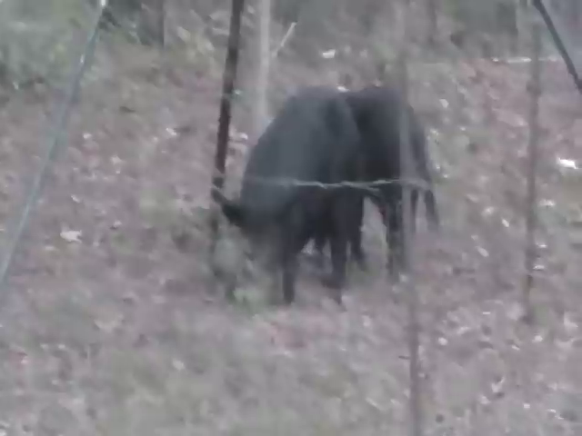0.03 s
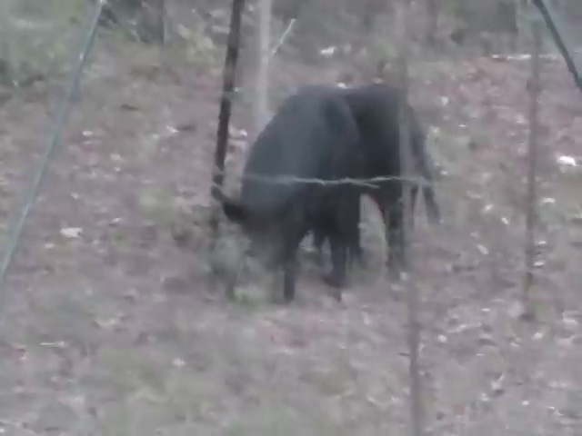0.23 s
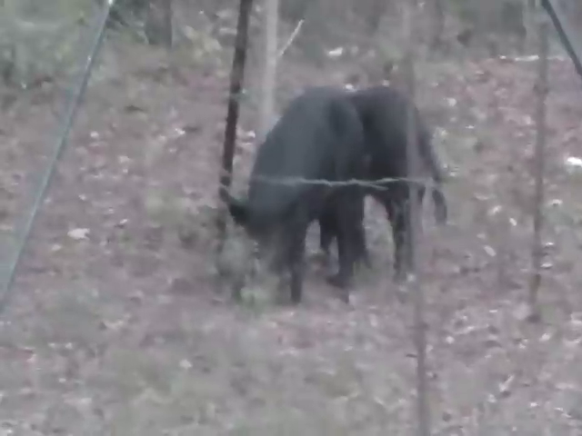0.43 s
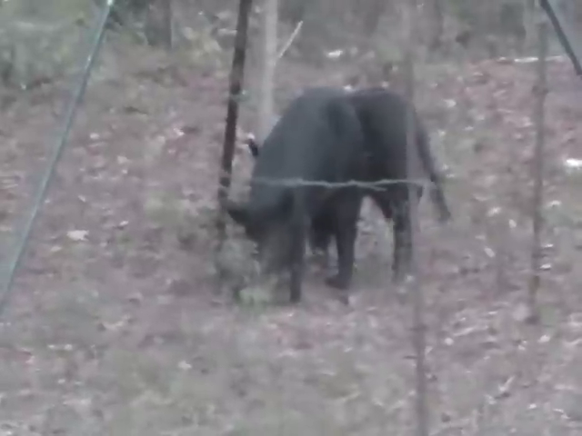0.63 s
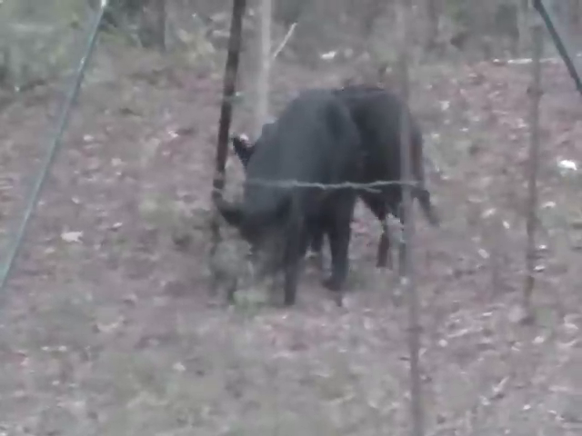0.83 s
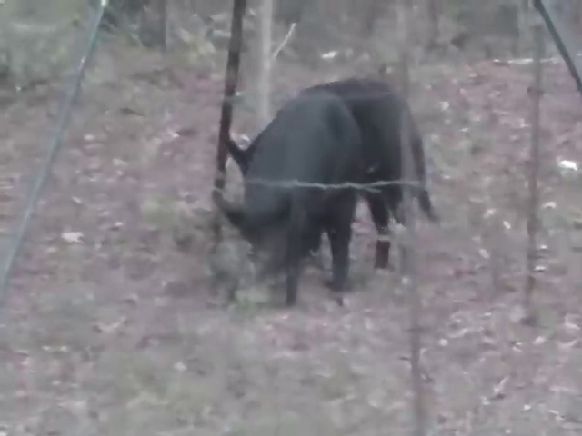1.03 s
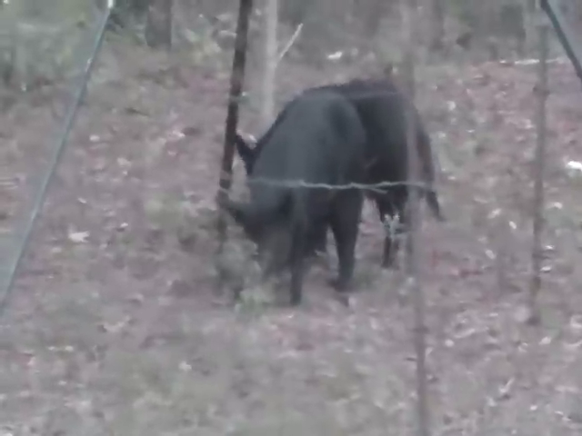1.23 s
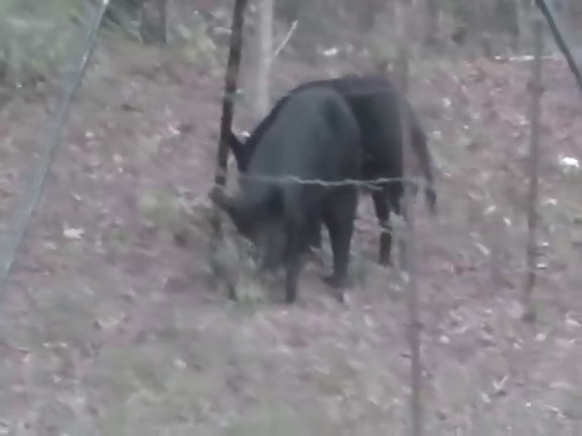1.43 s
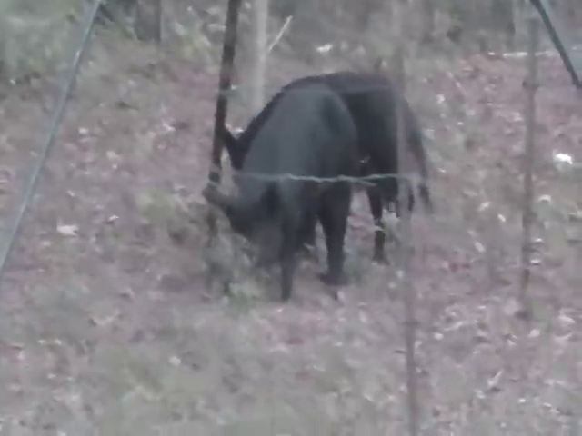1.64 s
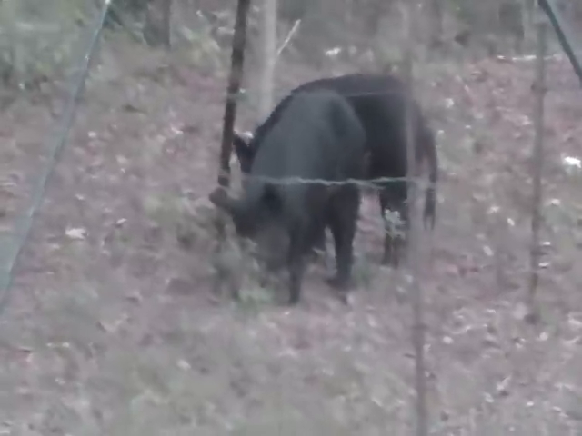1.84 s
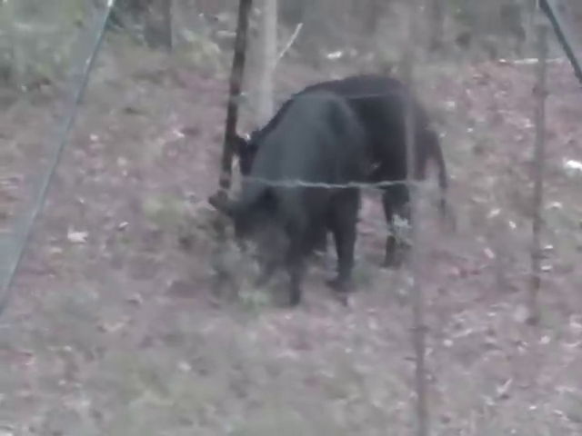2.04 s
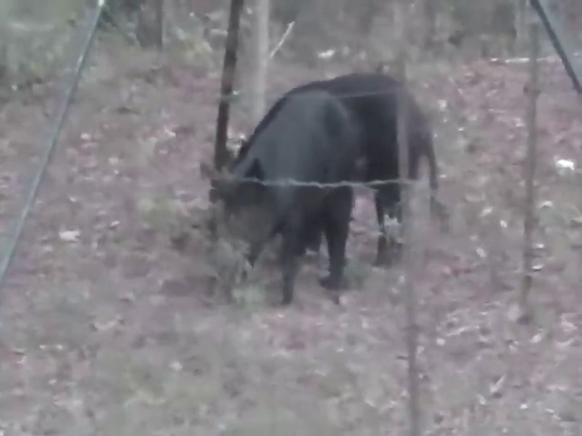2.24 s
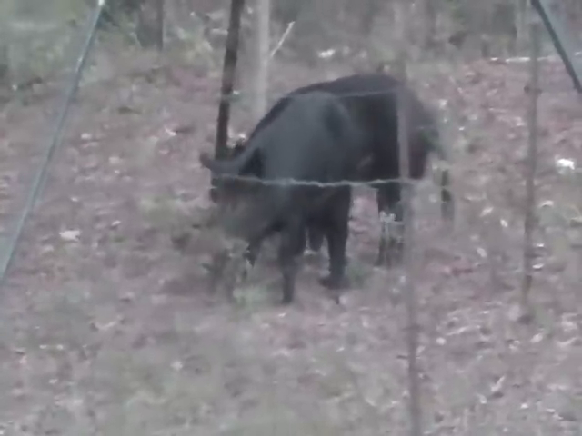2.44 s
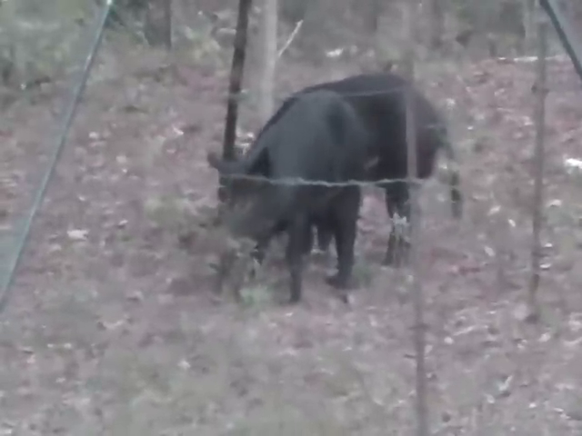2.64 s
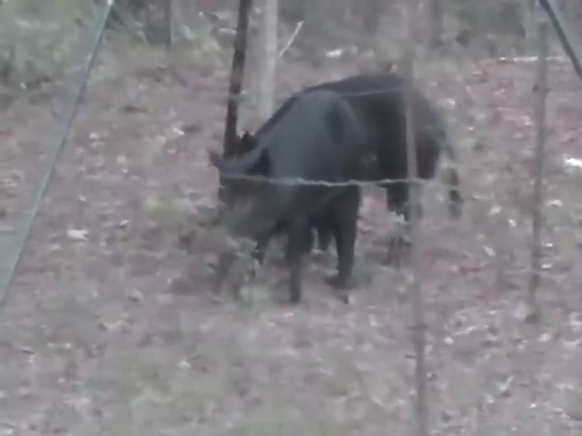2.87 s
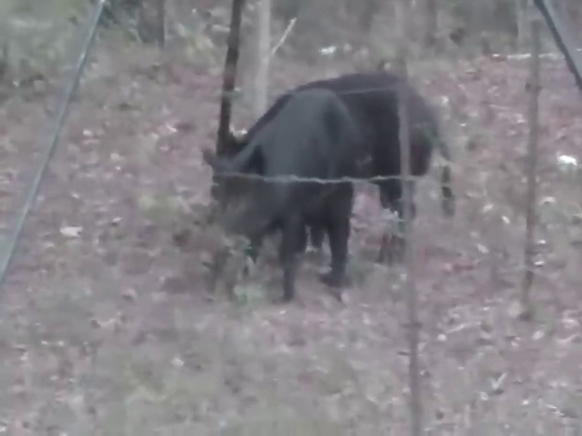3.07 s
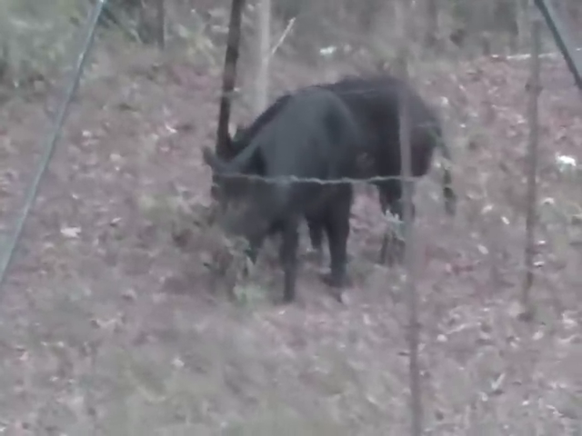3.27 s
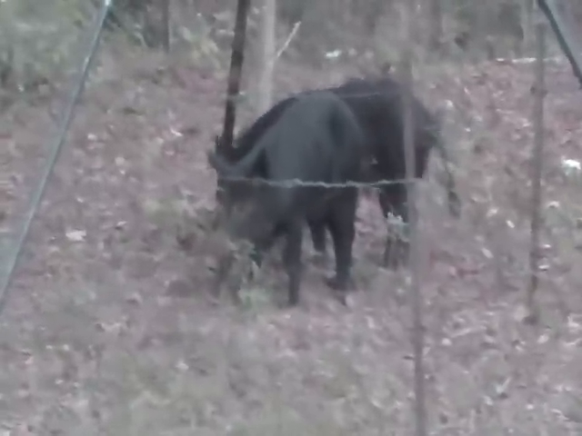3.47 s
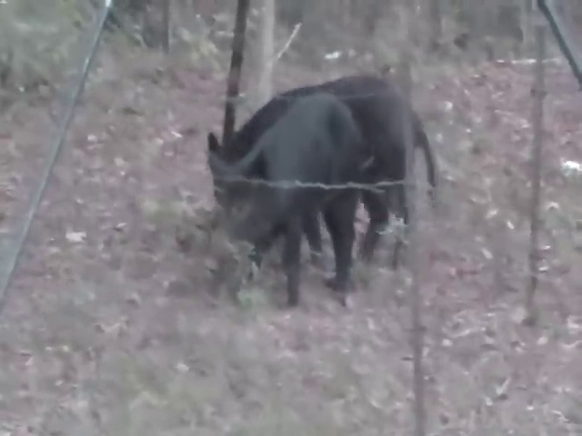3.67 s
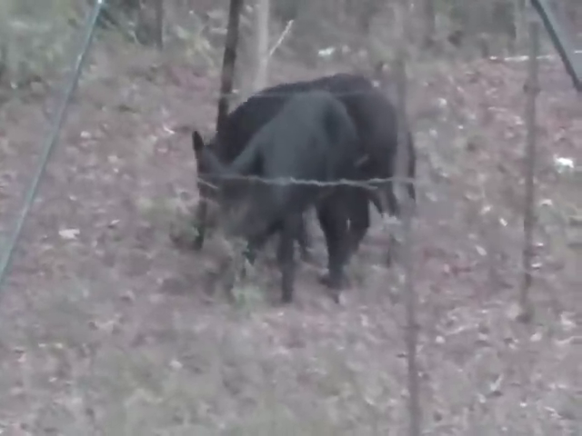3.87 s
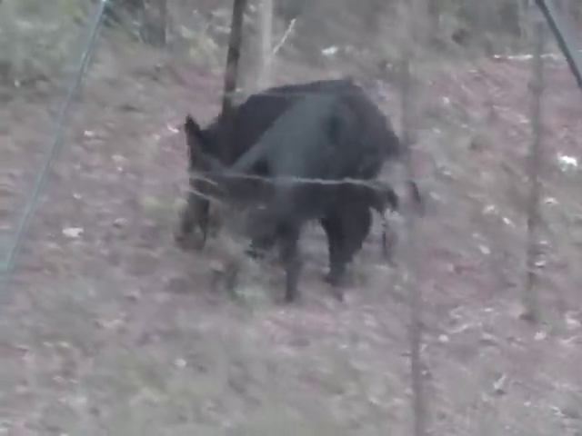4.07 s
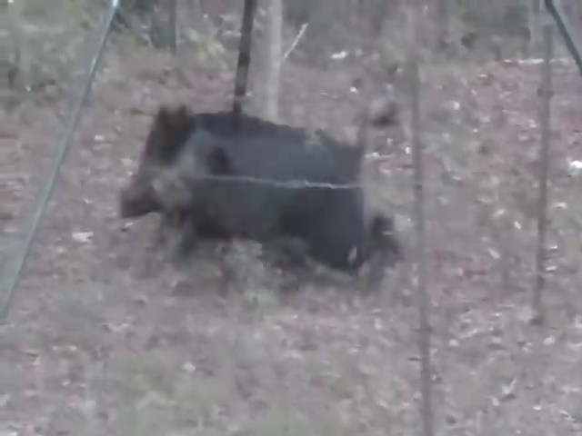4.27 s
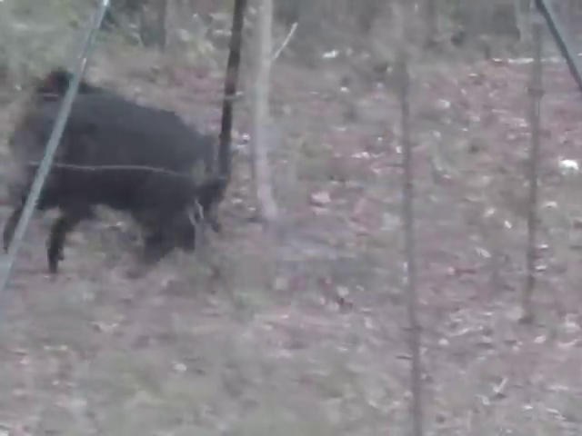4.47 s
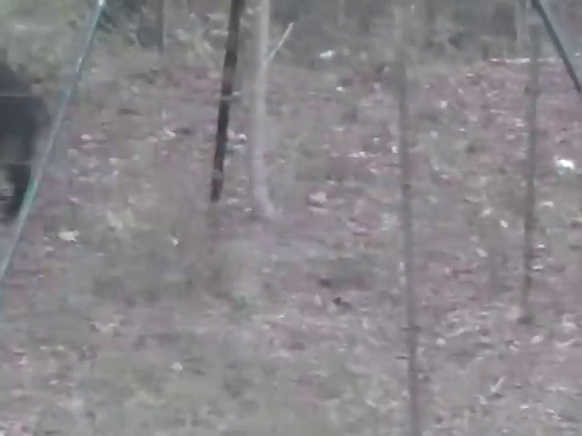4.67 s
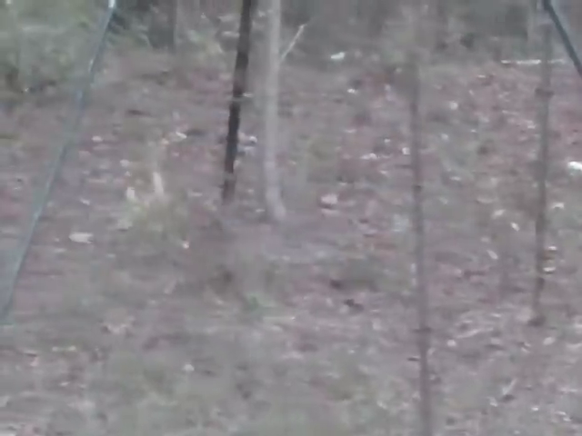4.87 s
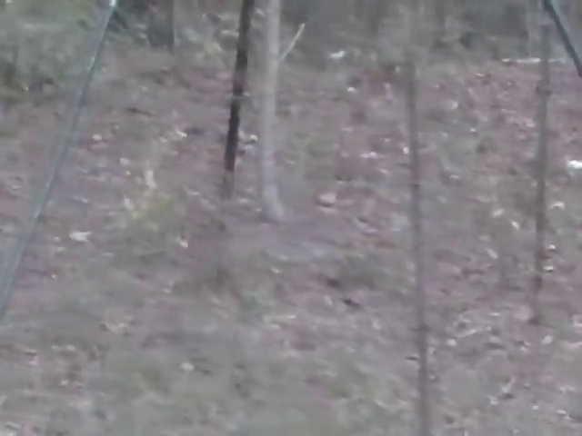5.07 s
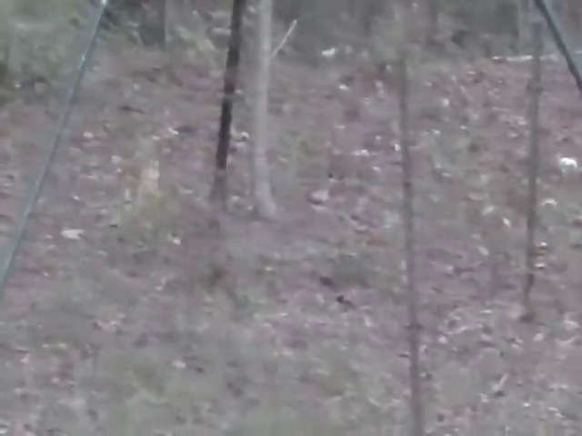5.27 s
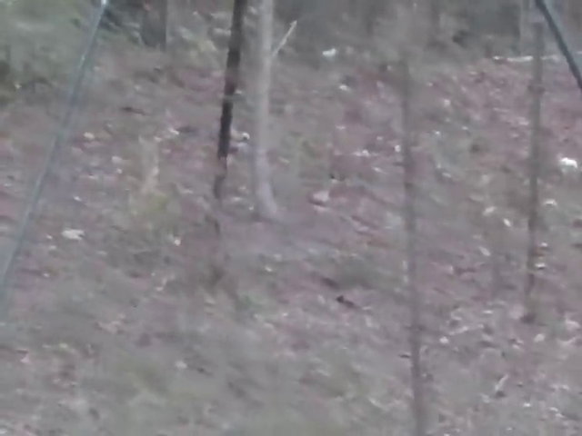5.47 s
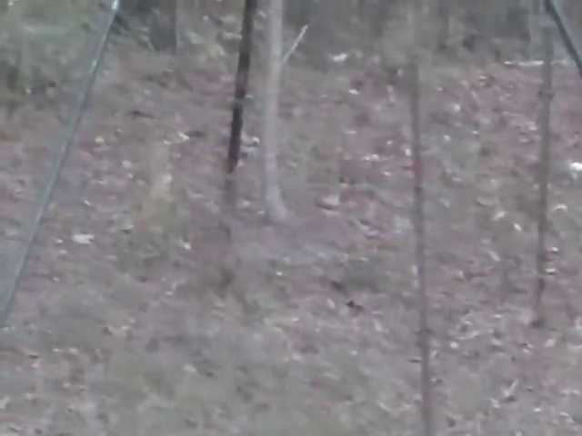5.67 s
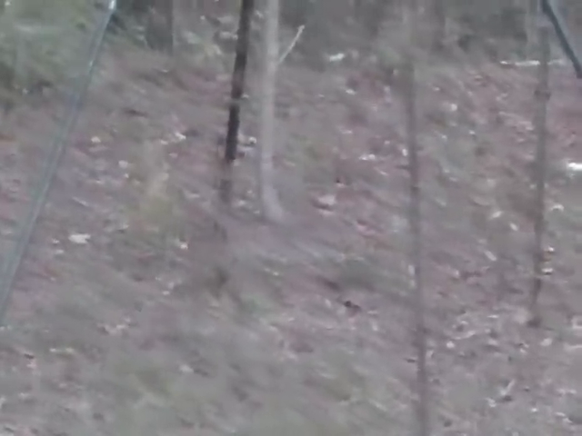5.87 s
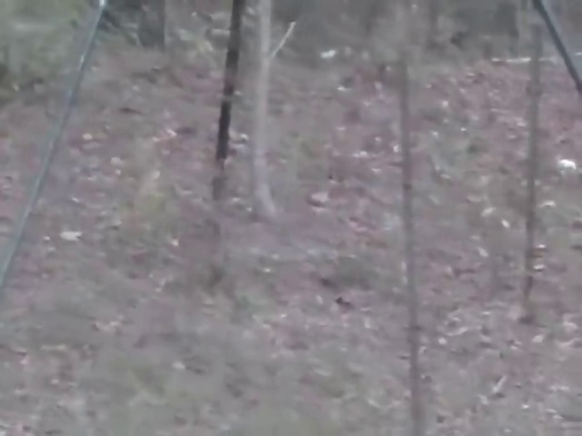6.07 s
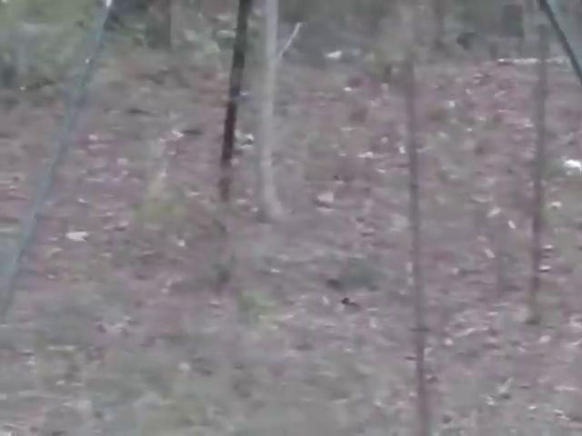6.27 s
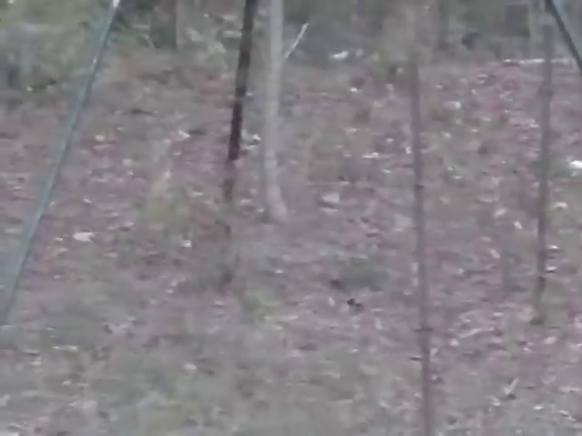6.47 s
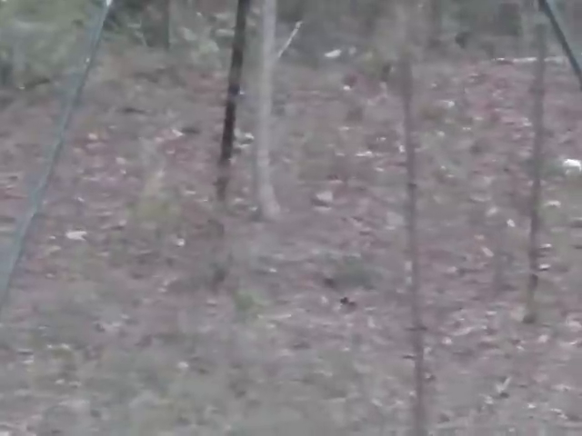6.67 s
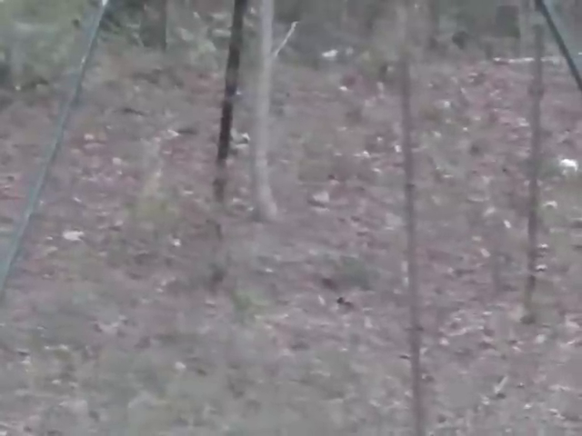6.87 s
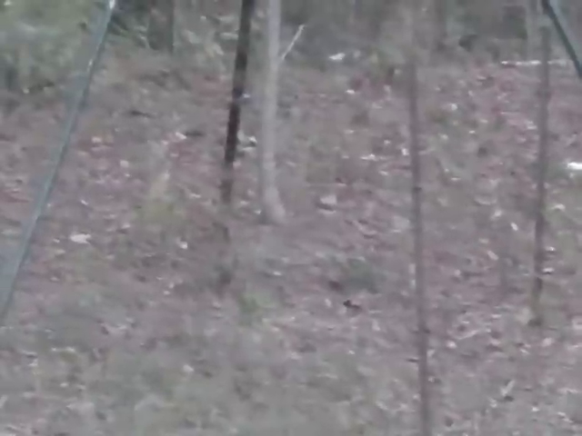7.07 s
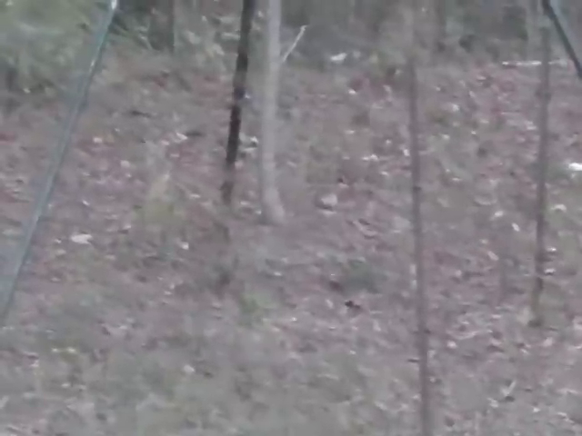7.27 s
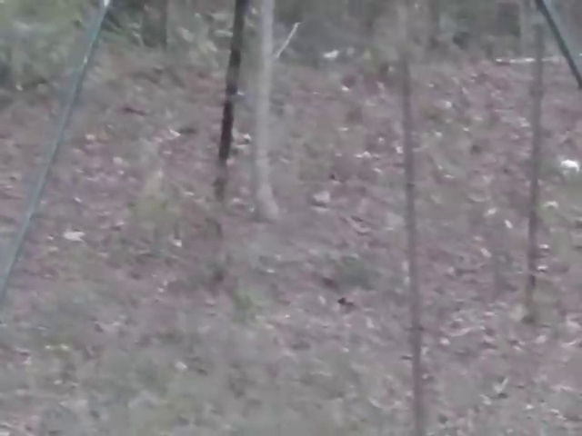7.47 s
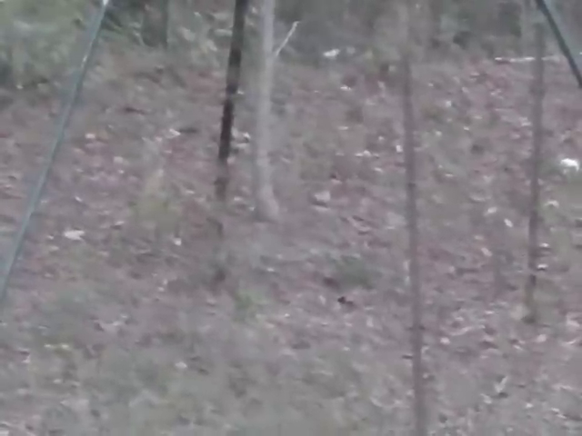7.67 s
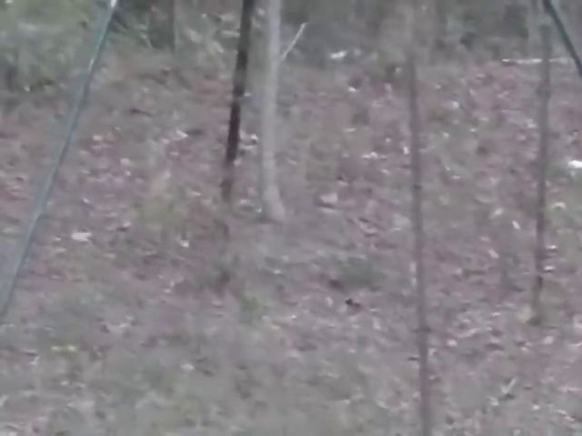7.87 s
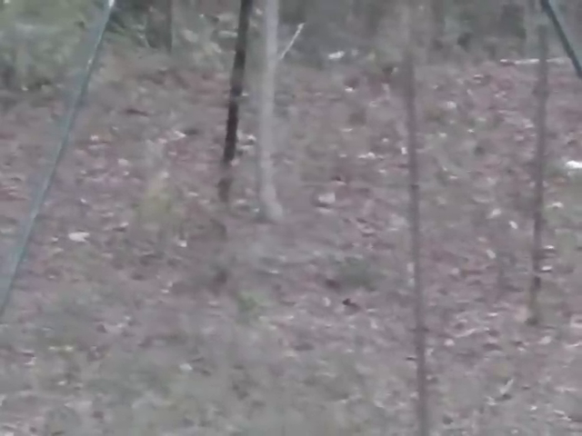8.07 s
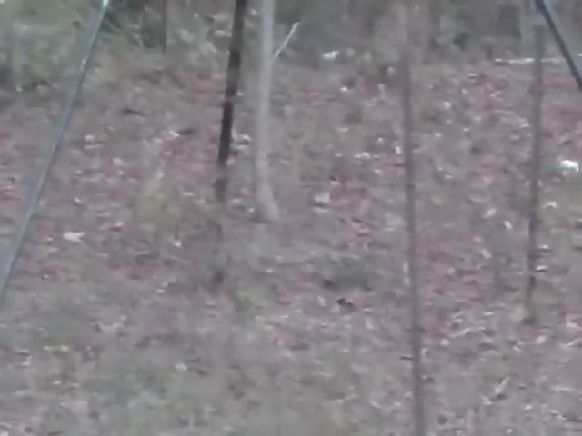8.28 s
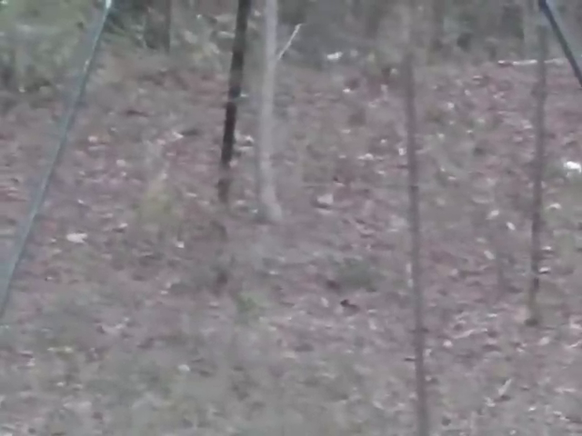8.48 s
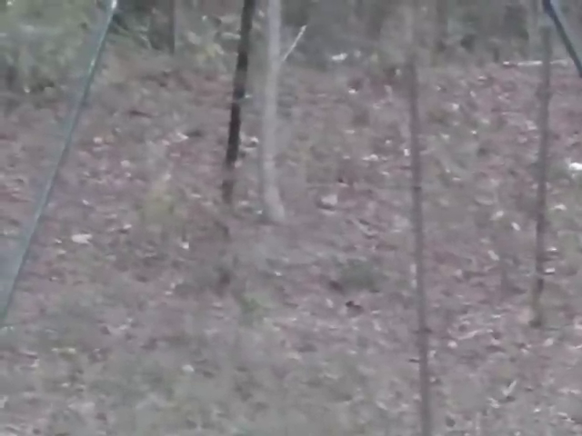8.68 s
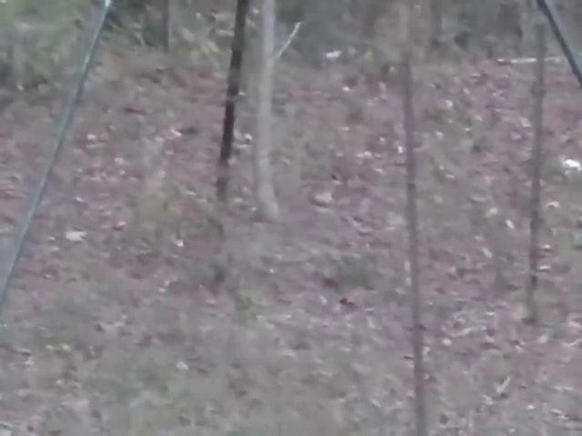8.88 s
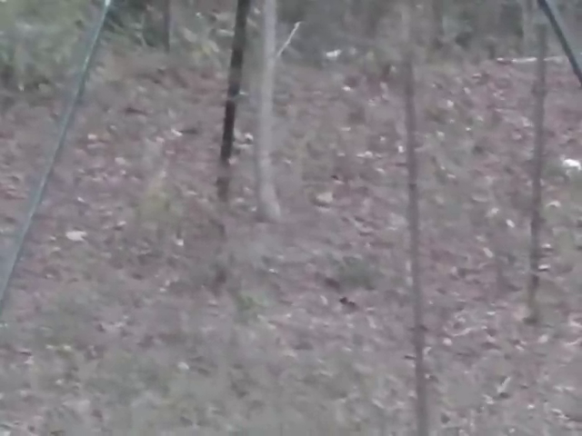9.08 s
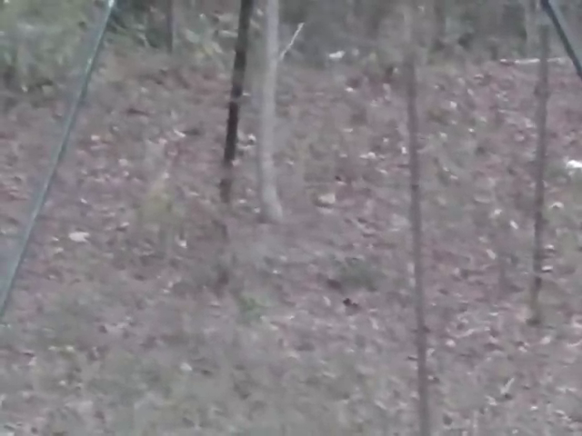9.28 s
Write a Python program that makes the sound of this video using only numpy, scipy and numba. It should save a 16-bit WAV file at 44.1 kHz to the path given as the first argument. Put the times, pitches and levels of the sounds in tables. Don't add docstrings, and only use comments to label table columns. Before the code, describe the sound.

Soft insect trills and faint leaf rooting under microphone hiss, then a loud close bow shot, a sharp strike, and hogs bolting through crackling brush.

```python
import sys
import numpy as np
from scipy import signal
from scipy.fft import rfft, irfft
from scipy.io import wavfile
from scipy.ndimage import uniform_filter1d
from numba import njit

SR = 44100
rng = np.random.default_rng(int(sys.argv[2]) if len(sys.argv) > 2 else 0)


def to_wav(s):
    ch = np.atleast_2d(s).T
    pcm = np.round(np.clip(ch, -1, 1) * 32767)
    wavfile.write(sys.argv[1], SR, pcm.astype(np.int16))


def gain_from_db(level_db):
    decades = np.asarray(level_db, float) / 20
    return 10 ** decades


N = 410571
TIME = np.arange(N) / SR

# f/Hz, level/dB per Hz
HISS_MID = [(15, -50.5), (25, -11), (70, -8.5), (120, -2), (309, -12.5), (416, -9), (575, -9.5),
            (1740, -12.5), (2000, -16), (3920, -19.5), (4740, -15), (5570, -18.5), (16000, -30.5)]
HISS_SIDE = [(15, -47.5), (25, -15), (114, -2.5), (394, -1.5), (476, -2.5), (818, -3.5), (3160, -10.5),
             (3620, -12), (4870, -15), (10700, -29), (16000, -28)]
# t/s, level/dB
ENGINE = [(0, -97), (1.6, -84), (2.4, -66.5), (3.6, -68), (4.5, -67.5), (6, -75.5), (9.31, -74)]
# first stroke t/s, last stroke t/s, top level/dB, f/Hz
LOW_CRICKET = [
    (.0144, .1825, -53, 3270),
    (1.275, 1.4456, -54, 3280),
    (3.3603, 3.5294, -54, 3260),
    (7.5941, 7.5941, -46, 3240),
]
LOWER_CRICKET = [
    (.6365, .776, -52.5, 3080),
    (2.5217, 2.618, -54.5, 3090),
    (2.485, 2.485, -60, 3090),
    (3.5638, 3.6052, -58, 3040),
]
HIGH_CRICKET = [(.1032, .145, -57, 5000), (.63, .765, -59, 4760), (.9423, .9852, -57, 5010),
                (1.1194, 1.2, -53, 4680), (1.14, 1.185, -57, 4750), (1.43, 1.5604, -57.5, 4745),
                (2.4643, 2.4643, -51.5, 4730), (2.8384, 2.925, -53, 4710), (2.71, 2.8, -61, 4700),
                (2.9, 2.95, -58, 4950), (2.575, 2.575, -59, 5050), (.655, .74, -60, 4800),
                (3.1098, 3.1098, -58, 4740), (3.1961, 3.3199, -56, 4770), (3.5129, 3.5593, -59, 4695),
                (7.395, 7.435, -48, 4900), (7.77, 7.812, -45, 4580), (8.163, 8.2043, -46.5, 4950),
                (8.9755, 9.0194, -46.5, 4880)]
# list of starts t/s, gap/s, level/dB, f/Hz, pitch ratio of the second stroke
SLOW_PAIRS = ([.2099, 1.0111, 1.7988, 2.6155, 3.3977], 0.039, -48, 4980, 1)
QUICK_PAIRS = ([.411, 1.056, 1.703, 2.3625, 2.9951], .034, -52, 5480, 0.98)
# t/s, length/s, start f/Hz, end f/Hz, level/dB
SWEPT_CALLS = [(0.464, 0.012, 6600, 8100, -55), (1.705, 0.019, 6300, 8300, -54.5),
               (3.643, 0.027, 3250, 3050, -59), (3.657, .016, 5700, 5200, -58),
               (.81, 0.11, 8700, 8050, -68), (.9, .08, 8050, 8300, -69), (.84, 0.16, 9400, 9200, -71),
               (1.3, 0.066, 7900, 7800, -64), (1.518, .13, 7400, 7300, -62.5),
               (1.738, .09, 7650, 7600, -65), (3.16, .07, 7600, 7000, -65), (3.218, 0.097, 7050, 7400, -68)]
# t/s, length/s, level/dB
TRILLS = [
    (0.502, 0.16, -60),
    (2.737, 0.25, -61),
]
# peak t/s, crackle level/dB, rise/s and fall/s over 20 dB, weight/dB
ROOTING = [(.24, -61, 0.098, 0.44, 2), (.3, -67, 0.17, 0.29, 4.5), (.39, -70, .2, 0.2, 6),
           (.44, -67, 0.31, 0.05, 8.5), (.68, -78, .4, 0.77, 11.5), (1.04, -56, 0.15, 0.17, -4.5),
           (1.28, -65, 0.16, .04, 6.5), (1.4, -68, 0.81, 1.2, 1), (1.73, -65, 1, 0.77, -2.5),
           (2.24, -78.5, 0.42, 1.04, 9.5), (2.88, -63, 0.068, 0.14, -4), (3.62, -83, 0.15, .04, 11.5),
           (3.98, -57.5, .3, 1.1, -1)]
BOLTING = [(4.2, -25.5, .004, 0.053, -19), (4.222, -34, 0.026, 0.1, -16), (4.234, -39, 0.053, 0.39, 3.5),
           (4.33, -46.5, .06, 0.13, 4.5), (4.71, -44, .03, 0.034, 2), (4.545, -44, 0.054, 0.32, 0),
           (4.639, -43.5, 0.12, 0.34, 1), (4.82, -40, 0.017, 0.28, -4), (4.918, -45.5, 0.15, 0.22, 4),
           (5.065, -42.5, 0.14, 0.17, 3.5), (5.213, -26.5, 0.15, .03, -3.5),
           (5.235, -21.5, 0.024, 0.21, -3), (5.37, -41, 0.085, 0.78, -5),
           (5.63, -46, 0.87, 0.32, 2), (5.879, -43, 0.2, 0.66, 0.5), (6.194, -37.5, 0.012, 0.12, 0),
           (6.287, -40.5, 0.11, 1, -1), (6.59, -46, 0.065, 0.054, -6), (6.65, -64, 0.12, 1, 3),
           (7.165, -46, 0.7, 0.71, 3), (7.514, -52, 0.26, 1, 3), (7.969, -50.5, 0.92, 0.4, 2),
           (8.142, -54.5, 0.23, 0.42, -0.5), (8.306, -46, 0.17, 0.38, 0.5), (8.45, -48.5, 0.067, 0.33, 1.5),
           (8.642, -53, 0.096, 0.43, 4), (8.758, -52.5, 0.15, 0.32, -2.5), (9.032, -50, 0.1, 0.74, 2),
           (9.15, -51.5, 0.3, 0.67, 1.5)]
# f/Hz, level/dB per Hz
CRACKLE = [(1530, -35.5), (2600, -3), (3440, -8), (4530, 0), (6380, -4), (9760, -14), (11700, -24.5),
           (13500, -23.5), (16000, -37)]
BRUSH = [(350, -42.5), (600, -11), (1070, -8), (1530, -3.5), (1910, -5), (3000, -6), (3900, -19.5),
         (6600, -120)]
GROUND = [(24, -38), (40, -4), (118, -1.5), (380, -3), (489, -1), (571, -8.5), (700, -3.5), (910, -27.5),
          (1540, -120)]
# t/s, peak level/dB, ring f/Hz
TICKS = [(.2394, -52, 1520), (.5826, -57, 1710), (1.0241, -46, 2270), (1.1967, -54, 1400),
         (2.3615, -50, 2750), (2.3974, -50, 1630), (2.4314, -51, 2350), (2.4553, -49, 2610),
         (2.5431, -45, 2830), (2.6444, -57, 1560), (2.8589, -52, 1240), (2.9023, -47, 1260),
         (2.9906, -60, 1040), (3.055, -48, 2500), (3.066, -50, 1700), (3.2779, -47, 3600),
         (3.4216, -50, 1700), (3.43, -56, 1290), (3.5119, -41, 2620), (3.5853, -50, 1820),
         (3.6002, -46, 1770), (7.054, -36, 8500), (7.525, -36.5, 2500), (7.745, -41, 2000),
         (8.332, -31, 5460), (5.7968, -42, 5140), (5.852, -37, 4000), (6.1914, -29, 4200),
         (6.335, -34, 4500), (4.9283, -36, 4500), (5.0405, -35, 4330), (5.24, -17, 3000),
         (6.292, -37, 2500), (6.327, -35, 1420)]
# t/s, peak level/dB, f/Hz
THUDS = [(4.196, -33, 368), (4.626, -46.5, 286), (4.702, -45.5, 323), (4.812, -55, 350), (5.046, -46, 390),
         (5.142, -46, 258), (5.388, -54, 137), (5.962, -51, 180), (6.186, -54, 283), (6.275, -51.5, 350),
         (7.198, -52, 409), (1.263, -54, 230)]
# t/s, peak level/dB, centre f/Hz, thump level over it/dB
SNAPS = [(0.289, -58, 1680, 9), (0.598, -47, 1700, -24), (1.261, -53, 1220, 12.5), (1.59, -47, 2110, -7),
         (3.025, -52, 6500, -23), (4.192, -20, 5000, -23), (4.1992, -18.5, 2720, -11.5),
         (4.1935, -6.5, 5600, -21.5), (4.5345, -34, 5200, -8), (4.7067, -36, 3500, -11),
         (5.226, -2.5, 4020, -27)]
# t/s, length/s, start f/Hz, end f/Hz, width/Hz
HOARSE = [
    (.5, .42, 470, 430, 90.),
    (2.18, .32, 450, 420, 120.),
    (5.52, .36, 480, 520, 110.),
    (7.78, .27, 1450, 1200, 600.),
]
HOARSE_DB = [-71, -76, -60.5, -57]
# t/s, peak level/dB, 60 dB decay/s, crack centre f/Hz
STRING_BLOWS = [(3.675, -22, 0.14, 3000), (3.691, -18.5, .05, 2600), (3.694, -5.5, 0.094, 5510),
                (3.6963, -5, 0.03, 5500), (3.704, -9.5, 0.083, 2500), (3.71, -8, 0.049, 2500),
                (3.722, -14.5, .08, 3500), (3.739, -19.5, .05, 5500), (3.753, -18, 0.03, 5490),
                (3.786, -29, .04, 5470), (3.812, -29.5, 0.04, 5500)]
# f/Hz, level/dB per Hz
STRING = [(530, -35), (900, 4), (1490, -4), (1720, -9), (2140, -4.5), (3430, -8.5), (4100, -8.5),
          (7310, -13.5), (10200, -17.5), (16000, -25)]
# f/Hz, width/Hz, level/dB
RISER = [(2400, 220, -8), (4020, 96, 3.5), (4280, 90, 6), (4790, 90, 2.5), (6300, 110, 6.5)]
# t/s, ring level/dB, swell time/s
SWINGS = [
    (3.675, -29.5, 0.0079),
    (3.691, -15, 0.004),
    (3.6972, -10, 0.0035),
    (3.704, -8, 0.015),
    (3.71, -5, 0.01),
    (3.722, -11.5, 0.0066),
    (3.739, -26.5, 0.0078),
    (3.748, -15.5, 0.0055),
]
# f/Hz, level/dB, share of the swell time
LIMBS = [(196, -14.5, 0.34), (423, -10.5, 0.51), (547, -5, 0.61), (729, -9.5, 0.5), (1297, -23.5, 0.41),
         (2540, -21, 0.26)]
# t/s, level/dB
RATTLES = [
    (3.7773, -12),
    (3.8060, -17),
    (3.8225, -27),
    (3.837, -31),
]
# f/Hz, level/dB, 60 dB decay/s
RATTLE_MODES = [(2930, 1.5, 0.012), (3600, 1, .011), (5160, 0, 0.0087), (6550, -3, .011), (4400, 0, 0.0093)]
# f/Hz, level/dB, 60 dB decay/s
AFTER_RING = [(231, -45.5, .28), (536, -32.5, 0.27), (557, -30.5, 0.24), (616, -42.5, .19), (475, -40, .32)]
# f/Hz, left minus right level/dB
BOW_LEAN = [(60, 3), (110, 1), (200, 0), (380, -3), (700, -1.5), (1290, -2.5), (2380, -3.5), (4400, -2),
            (8120, -1.5), (15000, 1)]
# t/s, peak level/dB, ring f/Hz, crunch time/s
TWIGS = [(4.5895, -35, 6800, 0.024), (4.8094, -43, 1670, 0.013), (5.053, -33.5, 2350, 0.011),
         (5.1387, -23.5, 4900, 0.02), (5.1625, -22, 5050, 0.012), (5.8306, -36, 5040, 0.0073),
         (5.8591, -32.5, 5100, 0.013), (5.9329, -36.5, 6100, 0.024), (6.1895, -36, 1750, 0.0045),
         (6.4303, -35.5, 4350, 0.033), (6.6508, -40.5, 4710, 0.013), (8.2796, -30, 5570, 0.004),
         (4.622, -39, 3000, 0.0012), (5.1163, -34, 4520, 0.001), (5.1982, -16.5, 4930, 0.005),
         (6.2034, -31, 6200, 0.0011), (6.291, -34, 2480, 0.00092), (6.326, -34, 1390, 0.001),
         (6.5772, -21.5, 5600, 0.0011), (7.3926, -37, 4900, 0.001), (7.6117, -33.5, 3970, 0.001),
         (7.9633, -33, 3700, 0.00094), (8.428, -25, 4830, 0.00083), (8.4644, -35, 4760, 0.0011),
         (8.4824, -35, 4820, 0.00069), (8.8164, -40, 4780, 0.001), (7.1751, -22.5, 7500, 0.0005),
         (8.1329, -34, 6000, 0.00053)]
# t/s, effort level/dB, mouth opening 0-1
SQUEAL = [
    (4.636, -58, 1.),
    (4.65, -45, 0.94),
    (4.72, -46.5, 0.37),
    (4.77, -40.5, 0.38),
    (4.845, -43, 0.27),
    (4.909, -38, 0.17),
    (4.95, -49.5, 0.05),
    (5.0, -52, 0.03),
    (5.02, -58, 0.),
]
# octave centre f/Hz, level/dB, 60 dB decay/s
WOOD = [(175.7, -30, 1), (357, -33.5, 2), (693, -28, 1.1), (1460, -22, 1.3), (2910, -23, 1.19),
        (5625, -20, 0.97), (11560, -28, 1.1)]


def unit(x):
    return x / np.sqrt(np.mean(x ** 2))


def colour(x, points):
    hz, db = np.transpose(points)
    grid_hz = np.linspace(1, SR / 2, 2049)
    gain_db = np.interp(np.log(grid_hz), np.log(hz), np.maximum(db, -70))
    cepstrum = irfft(np.log(gain_from_db(gain_db)))
    cepstrum[1:2048] *= 2
    cepstrum[2049:] = 0
    return signal.fftconvolve(x, irfft(np.exp(rfft(cepstrum))))[:len(x)]


def band(x, low_hz, high_hz, order=2):
    limits = [low_hz, min(high_hz, .45 * SR)]
    return signal.sosfilt(signal.butter(order, limits, "bandpass", fs=SR, output="sos"), x)


def noise_of(length=N):
    return rng.standard_normal(length)


def walk(rate):
    hold = int(SR / rate)
    steps = np.repeat(noise_of(N // 100), hold)[:N]
    return 1.3 * uniform_filter1d(uniform_filter1d(steps, hold), hold)


def add(track, s, sound):
    i = int(s * SR)
    track[..., i:i + sound.shape[-1]] += sound[..., :N - i]


def peak_one(x):
    return x / np.abs(x).max()


def tone(length, start_hz, end_hz):
    u = np.linspace(0, 1, int(length * SR))
    cycles = length * (start_hz * u + (end_hz - start_hz) * u ** 2 / 2)
    return np.sin(2 * np.pi * cycles) * np.sqrt(np.sin(np.pi * u).clip(0))


def rings(modes, t):
    return sum(gain_from_db(db - 60 * t / t60) * np.sin(2 * np.pi * hz * t) for hz, db, t60 in modes)


@njit
def throat(x, hz, width):
    y, b, l = np.empty(len(x)), 0., 0.
    for i in range(len(x)):
        g, k = np.tan(np.pi * hz[i] / SR), width / hz[i]
        v = (b + g * (x[i] - l)) / (1 + g * (g + k))
        b, l, y[i] = 2 * v - b, l + 2 * g * v, k * v
    return y


def hiss():
    mid = gain_from_db(-65 + .4 * walk(1.2)) * unit(colour(noise_of(), HISS_MID))
    side = gain_from_db(-60 + .4 * walk(3)) * unit(colour(noise_of(), HISS_SIDE))
    return np.array([mid + side, mid - side])


def engine():
    hz = 122.5 * (1 + .025 * walk(15))
    level_db = np.interp(TIME, *np.transpose(ENGINE)) + 0.5 + 2.2 * walk(12)
    return np.sin(2 * np.pi * np.cumsum(hz) / SR) * gain_from_db(level_db)


def chorus():
    out, patches = np.zeros(N), walk(5)
    chance = rng.standard_normal((2400, 3))
    starts = np.cumsum(np.abs(chance[:, 0])) / 170
    for s, (_, pitch, size) in zip(starts, chance):
        if s < TIME[-1]:
            hz = 4750 + 160.6 * pitch
            level_db = -74 + 3.5 * size + 2.5 * patches[int(s * SR)]
            add(out, s, gain_from_db(level_db) * tone(.024, hz * 1.03, hz * .97))
    return out


def crickets():
    out = np.zeros(N)
    stroke_s, grow_db, scatter_db = .044, 1, 0.8
    singers = ((LOW_CRICKET, -3.5, .017, .02), (LOWER_CRICKET, -3.5, .024, .045), (HIGH_CRICKET, -5.5, .022, .03))
    for table, gain_db, length, glide in singers:
        for first, last, db, hz in table:
            count = int(round((last - first) / stroke_s)) + 1
            for k, s in enumerate(np.linspace(last, first, count)):
                level_db = db + gain_db - grow_db * k + scatter_db * rng.standard_normal()
                add(out, s - .005, gain_from_db(level_db) * tone(length, hz * (1 + glide), hz * (1 - glide)))
    for starts, gap, db, hz, fall in (SLOW_PAIRS, QUICK_PAIRS):
        for s in starts:
            for k in range(2):
                stroke_hz = hz * fall ** k
                add(out, s + k * gap - .005, gain_from_db(db - 6.5) * tone(.022, stroke_hz * 1.04, stroke_hz * .96))
    return out


def swept_calls():
    out, rasp = np.zeros(N), unit(band(noise_of(), 20, 200))
    for s, length, start_hz, end_hz, db in SWEPT_CALLS:
        call = tone(length, start_hz, end_hz)
        rough = .65 * (length > .04)
        add(out, s, gain_from_db(db) * call * (1 - rough + rough * rasp[int(s * SR):][:len(call)]))
    return out


def trills():
    out, note_s = np.zeros(N), .0435
    beat = gain_from_db(2 * walk(30)) * (1 + .15 * unit(band(noise_of(), 20, 200)))
    for s, length, db in TRILLS:
        t = TIME[:int(length * SR)]
        fade = ((length - t) / (.4 * length)).clip(0, 1) * (.6 + 4 * t).clip(0, 1)
        gaps = (np.abs(np.sin(np.pi * t / note_s)) * 3).clip(.1, 1)
        dips = (np.abs(np.cos(np.pi * t / note_s)) * 3).clip(.3, 1)
        call = np.sin(2 * np.pi * 3350 * t) * fade * gaps * dips
        add(out, s, gain_from_db(db) * call * beat[int(s * SR):][:len(t)])
    return out


def stir(s, db, rise, fall):
    t = TIME[::64, None] - s
    energy = gain_from_db(2 * db - 40 * np.where(t < 0, -t / rise, t / fall))
    return np.interp(TIME, TIME[::64], np.sqrt(energy.sum(axis=1)))


def leaves(table, per_s, scatter_db, flicker_db, gain_db, brush_db, ground_db):
    s, db, rise, fall, weight_db = np.transpose(table)
    happens, size = rng.random((2, N))
    cracks = (happens < per_s / SR) * gain_from_db(np.minimum(-scatter_db * np.log(1 - size), 14))
    smear = np.exp(-TIME[:400] / 0.0019)
    push = signal.fftconvolve(cracks ** 2, smear)[:N].clip(0)
    grains = unit(noise_of() * np.sqrt(1.6 + push / push.mean())) * gain_from_db(flicker_db * walk(30))
    bending = grains * gain_from_db(0.6 * walk(13))
    thuds = noise_of() * gain_from_db(0.77 * walk(22))
    retreat_db = 1.5 * np.maximum(s - 4.1, 0)
    thud_db = ground_db + 0.59 * (db + 49.5) + weight_db - retreat_db
    crackle = unit(colour(grains, CRACKLE)) * stir(s, db, rise, fall)
    brush = unit(colour(bending, BRUSH)) * stir(s, db + brush_db + weight_db, rise, fall)
    ground = unit(colour(thuds, GROUND)) * stir(s, thud_db, rise, fall)
    return gain_from_db(gain_db) * (crackle + brush + ground)


def ticks():
    out, t = np.zeros(N), TIME[:2500]
    for s, db, hz in TICKS:
        click = np.exp(-t / .00005) + .12 * noise_of(len(t)) * np.exp(-t / .003)
        add(out, s, gain_from_db(db) * peak_one(band(click, hz / 1.4, hz * 1.4)))
    for s, db, hz in THUDS:
        u = 3 * t / 0.0085
        add(out, s, gain_from_db(db) * u * np.exp(1 - u) * np.sin(2 * np.pi * hz * t * (1 - 3 * t)))
    return out


def snaps():
    out, t = np.zeros(N), TIME[:3000]
    for s, db, hz, thump_db in SNAPS:
        noise = noise_of(len(t))
        burst = noise * (np.exp(-t / .0012) + .2 * np.exp(-t / .012)) * (1 - np.exp(-t / .0003))
        crack = band(burst, hz / 2.88, hz * 1.6)
        knock = band(noise * np.exp(-t / 0.0047), 180, 614)
        add(out, s, gain_from_db(db) * (peak_one(crack) + gain_from_db(thump_db) * peak_one(knock)))
    return out


def hoarse_cries():
    out, breath = 0, noise_of()
    for (s, length, start_hz, end_hz, width), db in zip(HOARSE, HOARSE_DB):
        u = ((TIME - s) / length).clip(0, 1)
        centre = start_hz + (end_hz - start_hz) * u
        voice = unit(throat(throat(breath, centre, width), centre, width))
        out = out + voice * np.sqrt(np.sin(np.pi * u).clip(0)) * gain_from_db(db)
    return out * gain_from_db(2.5 * walk(30))


def bow_string():
    out, t = np.zeros(N), TIME[:9000]
    for s, db, t60, centre_hz in STRING_BLOWS:
        burst = colour(noise_of(len(t)) * gain_from_db(-60 * t / t60), STRING)
        add(out, s, gain_from_db(db) * peak_one(band(burst, centre_hz / 2.3, centre_hz * 2.6)))
    handle = sum(gain_from_db(db) * band(out, hz - width / 2, hz + width / 2, order=1) for hz, width, db in RISER)
    return out + handle


def bow_limbs():
    out, t = np.zeros(N), TIME[:9000]
    for s, db, swell in SWINGS:
        ring = 0
        for hz, mode_db, share in LIMBS:
            u = t / (share * swell)
            ring = ring + gain_from_db(mode_db) * u * np.exp(1 - u) * np.sin(2 * np.pi * hz * t)
        add(out, s, gain_from_db(db) * band(ring, 150, 8000))
    return out


def bow_rattle():
    out, t = np.zeros(N), TIME[:9000]
    for s, db in RATTLES:
        add(out, s, gain_from_db(db) * rings(RATTLE_MODES, t) * (1 - np.exp(-t / .0004)) / 2)
    add(out, 3.752, rings(AFTER_RING, t) * (1 - np.exp(-t / .01)))
    return out


def twigs():
    out, t = np.zeros(N), TIME[:4000]
    for s, db, hz, crunch in TWIGS:
        splinters = 40 * crunch * noise_of(len(t)) * np.exp(-t / max(crunch, .0003))
        snap = np.exp(-t / .00005) + splinters
        sound = band(snap, hz / 1.76, hz * 1.48) + 5.1 * band(snap, hz / 1.02, hz * 1.08, order=1)
        add(out, s, gain_from_db(db + 2.0) * peak_one(sound))
    return out


def squeal():
    s, effort_db, opening = np.transpose(SQUEAL)
    phase = np.cumsum(130 * np.exp(.25 * walk(110))) / SR % 1
    source = (.8 + np.exp(-phase / 0.11)) * noise_of()
    effort = np.interp(TIME, s, effort_db - 4.0, left=-130, right=-130)
    mouth = np.interp(TIME, s, opening).clip(0, 1)
    first_hz = 985 + (1106 - 985) * (mouth / 0.26).clip(0, 1)
    first_db = 4 + (-9 - 4) * np.sqrt(mouth)
    second_hz = 1460 + (2200 - 1460) * mouth
    second_db = -3 * (1 - 8 * mouth).clip(0)
    voice = 0
    for centre, db, width in ((first_hz, first_db, 210.), (second_hz, second_db, 380.)):
        sharp = throat(throat(source, centre, width), centre, width)
        spill = .3 * throat(source, centre, 3 * width)
        voice = voice + unit(sharp + spill) * gain_from_db(effort + db + 2.8 * walk(70))
    return voice


def wood(x):
    out, t, width = 0, TIME[:int(1.5 * SR)], 0.37
    for hz, db, t60 in WOOD:
        low_hz, high_hz = hz / 2 ** .5, hz * 2 ** .5
        fade = gain_from_db(-120 * t / t60) + gain_from_db(2 * 9 - 120 * t / .3)
        fade = fade * (1 - np.exp(-t / .006)) / (.07 * SR)
        energy = signal.fftconvolve(band(x, low_hz, high_hz) ** 2, fade)[:N].clip(0)
        mid = unit(band(noise_of(), low_hz, high_hz))
        side = width * unit(band(noise_of(), low_hz, high_hz))
        out = out + gain_from_db(db) * np.sqrt(energy) * np.array([mid + side, mid - side])
    return out


def scene():
    insects = chorus() + crickets() + swept_calls() + trills()
    rooting = leaves(ROOTING, 300, 3.0, 1.4, -2.3, -1.3, -58.5)
    running = leaves(BOLTING, 600, 4.1, 0.89, -2.54, -7, -57.5)
    hogs = rooting + running + ticks() + snaps() + hoarse_cries() + twigs() + squeal()
    far = hogs * gain_from_db(np.array([[.2], [-.2]])) + insects
    bow = bow_string() + bow_limbs() + bow_rattle()
    shot = np.array([colour(bow, [(hz, ear * db / 2) for hz, db in BOW_LEAN]) for ear in (1, -1)])
    far = far + wood((shot + far).mean(axis=0))
    far_port = gain_from_db(-12.5) * band(far.mean(axis=0), 9700, 16200)
    bow_port = gain_from_db(-1) * band(bow, 11500, 17000)
    ports = np.roll(far_port + bow_port, 1)
    ports = ports + gain_from_db(-17.5) * np.roll(band(bow, 300, 3500), 30)
    return band(shot + far, 64.1, 19000, order=3) + ports * np.array([[1], [-1]]) + engine() + hiss()


def roll_off(x):
    return signal.sosfilt(signal.butter(12, 16460, fs=SR, output="sos"), x)


def record(dry):
    top = signal.ellip(8, .2, 60, 15850, fs=SR, output="sos")
    mix = signal.sosfilt(top, np.clip(dry, -.95, .95))
    return roll_off(mix)


dry = scene()
out = record(dry)
to_wav(out)
```